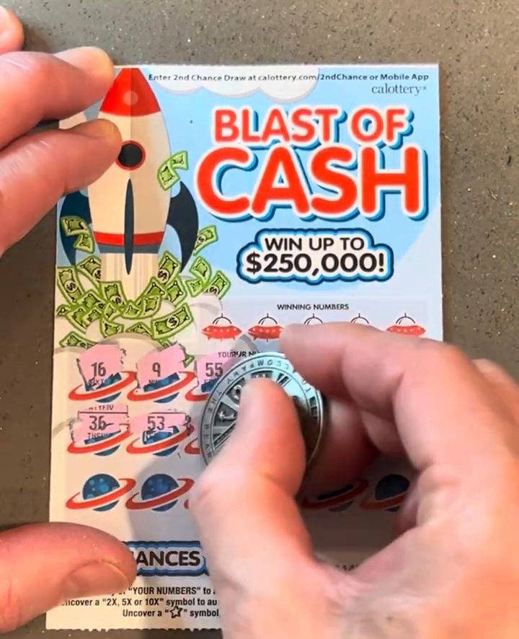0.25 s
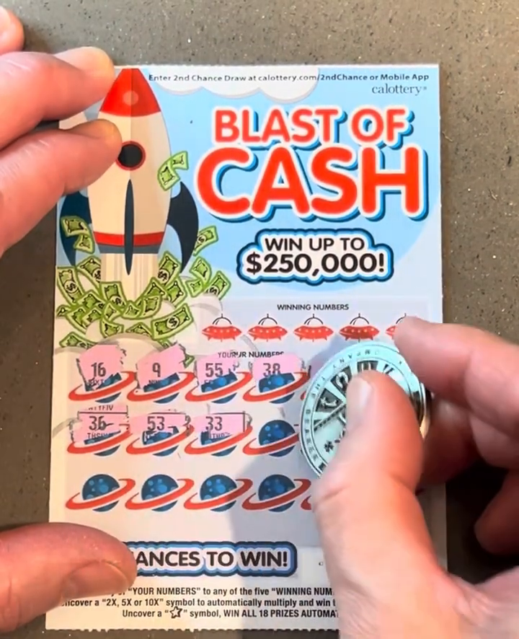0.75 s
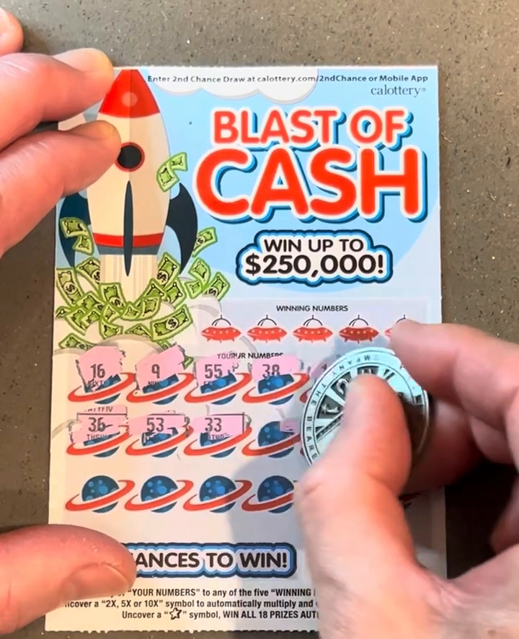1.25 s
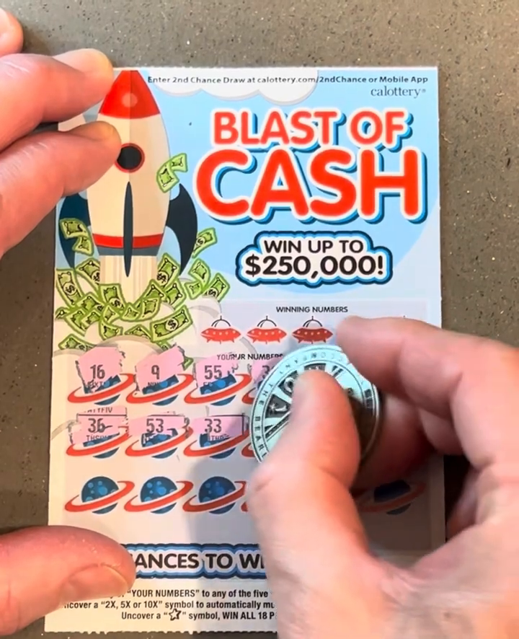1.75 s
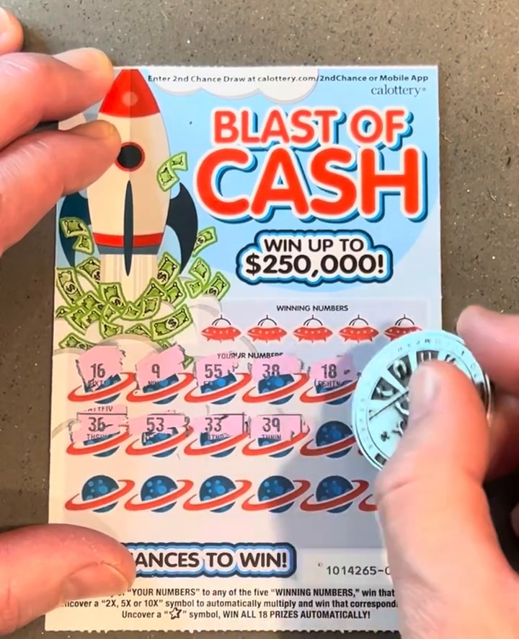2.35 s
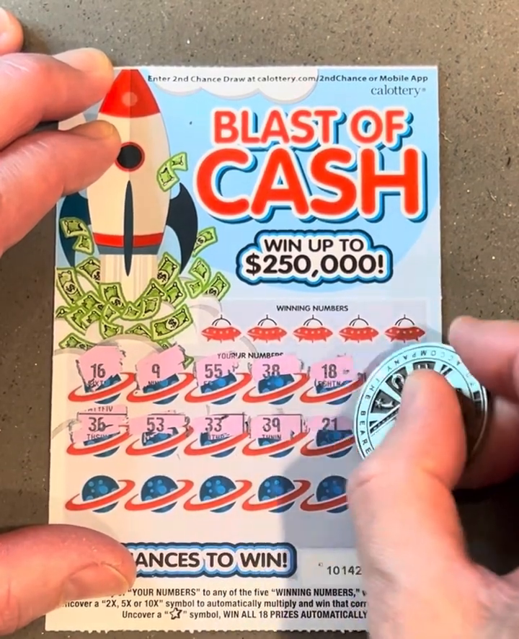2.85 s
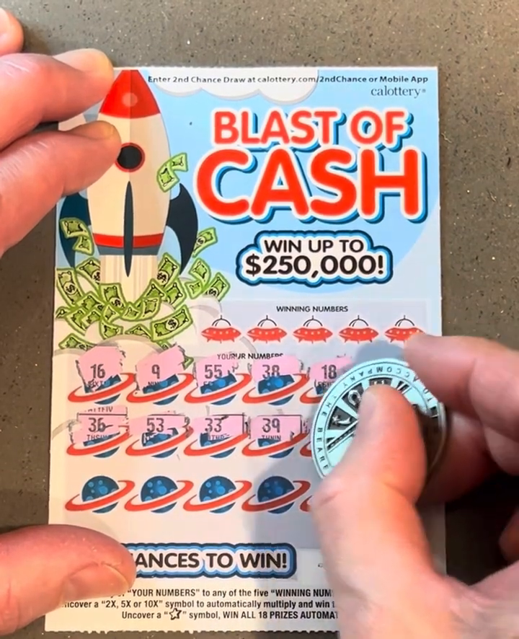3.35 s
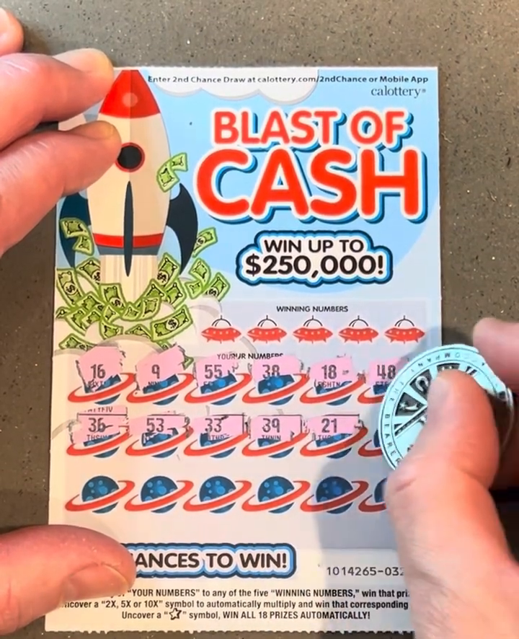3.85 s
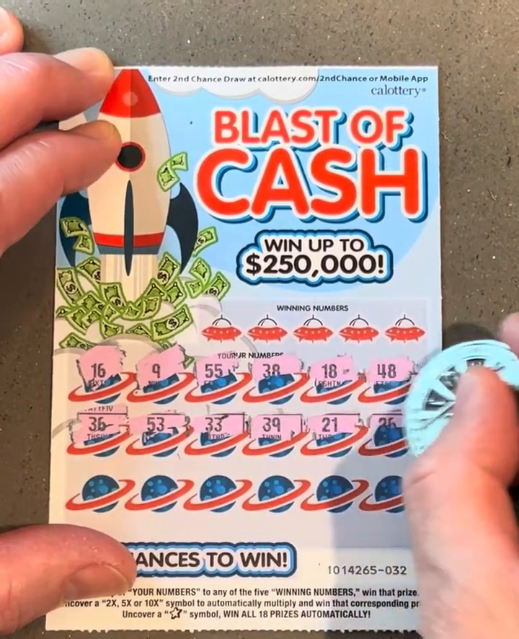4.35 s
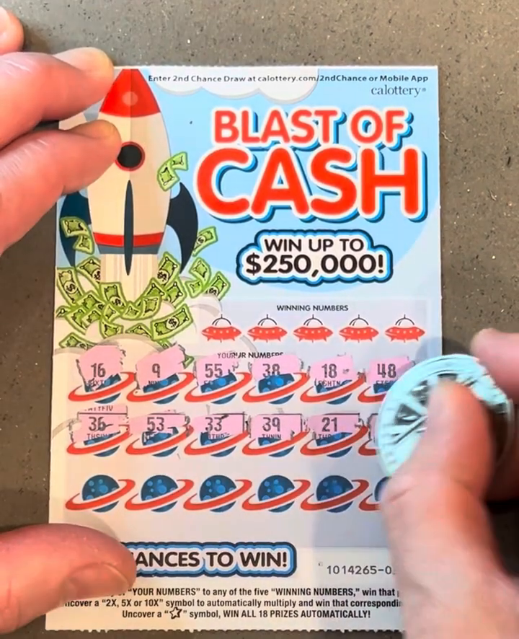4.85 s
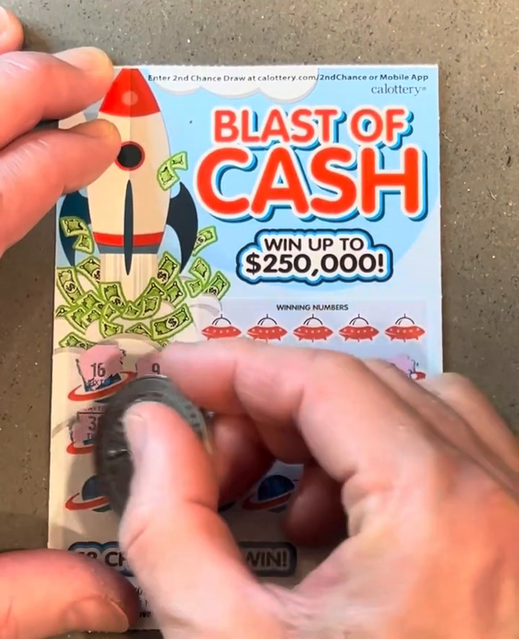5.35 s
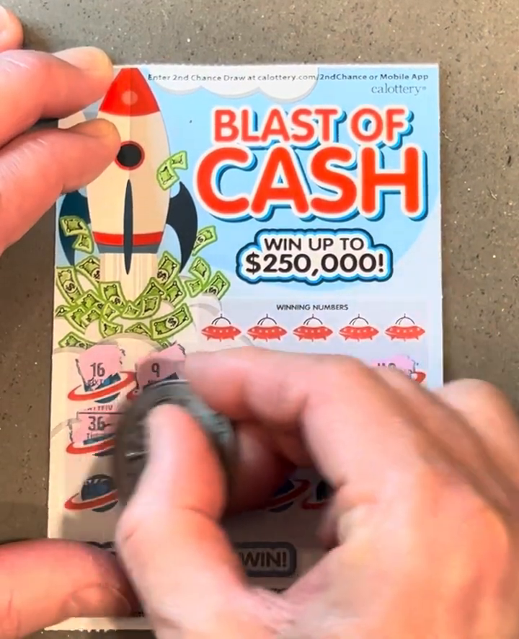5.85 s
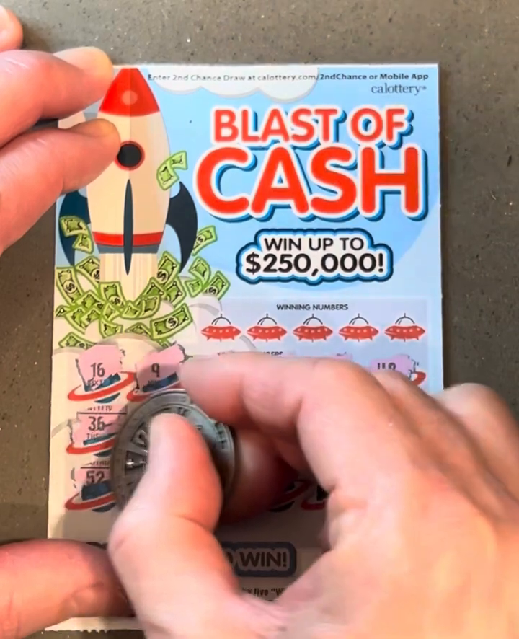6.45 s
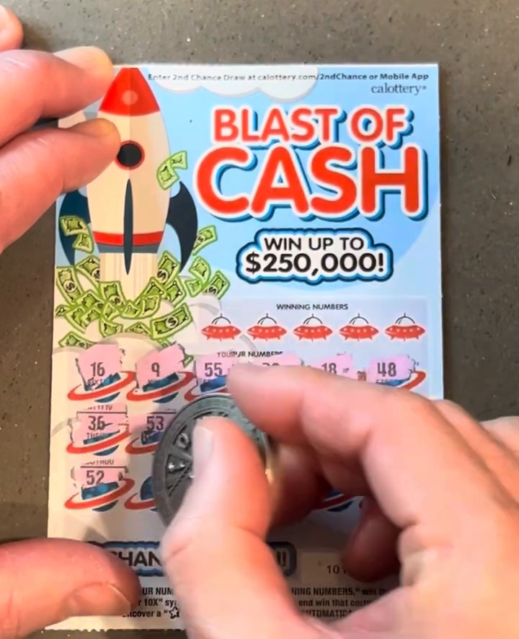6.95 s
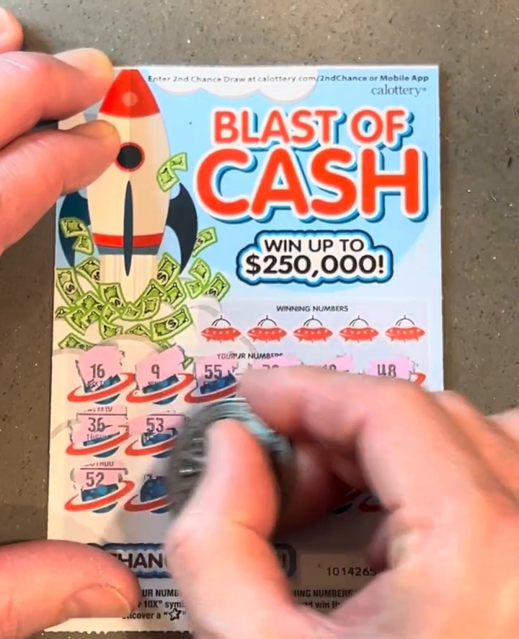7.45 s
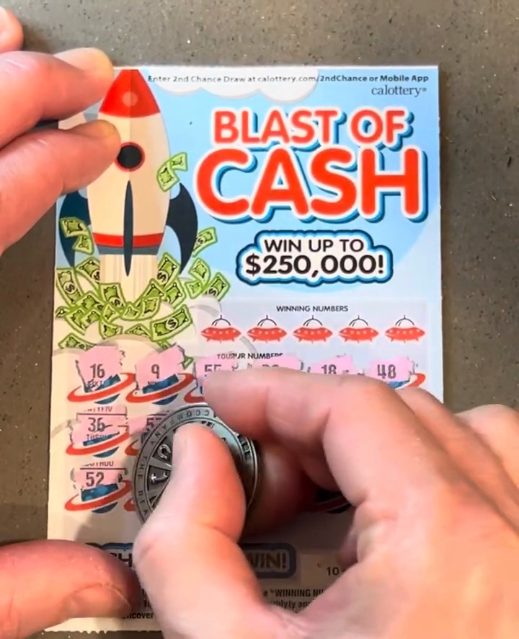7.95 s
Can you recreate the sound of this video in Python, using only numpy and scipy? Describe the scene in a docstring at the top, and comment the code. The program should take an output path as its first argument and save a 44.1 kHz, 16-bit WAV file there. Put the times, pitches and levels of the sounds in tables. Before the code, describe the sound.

Close stereo microphones in a small, quiet room. A coin scrapes coating from a card on a hard table in fast, gritty back-and-forth strokes, about ten a second. Runs of scraping stop for short pauses, each restarted with a light tap and tick. Past the middle one sharp, ringing knock hits the bare table; then scraping resumes, with soft hand thumps, scuffs and card crackles before a last steady run.

```python
"""Coin scratching a paper ticket

A coin scrapes the coating off a ticket on a hard table: stick-slip friction excites card, crumbs and coin.
It taps down with edge ticks, and one sharp knock on the bare table rings a bank of decaying modes.
The side of the hand hisses, rumbles and bumps; the card scuffs and crackles as impulses and filtered noise.
Echoes, diffuse tails and quiet room air reach two close microphone ports, which differ in phase and level."""
import sys
import numpy as np
from scipy import signal
from scipy.fft import rfft, irfft
from scipy.io import wavfile
from scipy.ndimage import uniform_filter1d

SR = 44100
rng = np.random.default_rng(int(sys.argv[2]) if len(sys.argv) > 2 else 0)


def generate_wav(signal):
    """Clip the signal to [-1, 1] and save it as 16-bit WAV at the path in sys.argv[1]."""
    frames = np.transpose(np.atleast_2d(signal))
    scaled = np.clip(frames, -1, 1) * 32767
    pcm = np.round(scaled).astype(np.int16)
    wavfile.write(sys.argv[1], SR, pcm)


N = 361179   # length [samples]

# Levels in the tables are relative: mixing gains and acoustics act on them later.
# room air and microphone hiss: (frequency [Hz], spectral density [dB])
AIR_SPECTRUM = [(20, -17), (65, 6), (300, -5.5), (1000, -37.5), (1800, -18), (4000, -46.5), (10000, -34.5),
                (11800, -20.5), (16000, -42.5)]

# the hand sliding over card and table: (time [s], hiss level [dB])
SLIDE_LEVEL = [(0, -76.5), (0.55, -84.5), (0.74, -72.5), (0.88, -77), (1.02, -68), (1.15, -75.5),
               (1.45, -75.5), (1.8, -85), (3.98, -88.5), (4.12, -68.5), (4.27, -77.5), (4.75, -75),
               (4.87, -81.5), (4.97, -73.5), (5.9, -74), (6.0, -65.5), (6.2, -78.5), (6.68, -64),
               (6.82, -73.5), (7.32, -64), (7.47, -85.5), (8.19, -82.5)]
# colour of the sliding skin: (frequency [Hz], spectral density [dB])
SKIN_SPECTRUM = [(200, 9), (600, 0), (1150, 8), (1600, 8.5), (2200, 6.5), (3200, 5), (4000, 1), (7500, 3),
                 (9500, 0), (12000, 3.5), (16000, -12.5)]
# the hand's weight rumbling through the table: (time [s], level [dB])
RUMBLE_LEVEL = [(0.0, -61), (0.82, -66), (1.25, -58), (1.91, -60.5), (2.37, -64.5), (2.69, -62),
                (3.56, -62), (5.81, -60.5), (6.52, -60), (6.89, -56), (7.12, -60), (8.19, -59)]
# colour of that rumble: (frequency [Hz], spectral density [dB])
RUMBLE_SPECTRUM = [(20, -27), (45, 2), (68, 4), (95, 2), (150, 2), (230, -1.5), (330, -7.5), (480, -12.5),
                   (650, -21.5), (1200, -49)]
RUMBLE_WAVER_DB = 2.5   # the hand's weight shifts unevenly

# the coin's back-and-forth strokes:
# (middle time [s], length [s], rasp of card [dB], crunch of coating [dB], ring of coin [dB])
STROKES = [(0.048, 0.055, -62.5, -87, -83), (0.142, 0.082, -50.0, -66, -65.5),
           (0.252, 0.064, -66.0, -73, -86), (0.33, 0.078, -59.0, -89, -82), (0.424, 0.073, -58.5, -70, -69),
           (0.901, 0.073, -61.5, -69, -86), (1.002, 0.084, -56.0, -63.5, -82),
           (1.106, 0.07, -59.0, -65, -74), (1.224, 0.061, -53.5, -70, -82),
           (1.322, 0.061, -58.0, -62, -69.0), (1.418, 0.06, -61.0, -72, -80),
           (1.512, 0.072, -59.5, -66, -70), (1.6, 0.062, -58.0, -67, -74.5),
           (1.712, 0.076, -61.0, -72, -79), (1.831, 0.06, -55.5, -76, -77), (1.914, 0.057, -60.5, -68, -75),
           (2.013, 0.084, -49.5, -64.5, -66), (2.122, 0.057, -61.0, -73.5, -70.5),
           (2.21, 0.096, -66.0, -84, -78), (2.623, 0.087, -48, -63, -63), (2.733, 0.066, -63.0, -65, -68),
           (2.822, 0.077, -51.0, -70, -66.5), (2.93, 0.051, -63.0, -65, -65),
           (3.02, 0.052, -62.0, -88, -77.5), (3.102, 0.065, -63.5, -72, -74),
           (3.2, 0.083, -51.5, -70.5, -66.5), (3.333, 0.057, -63.0, -70, -69.5),
           (3.395, 0.05, -58, -90, -79), (3.825, 0.065, -63.0, -86, -76), (3.921, 0.081, -59.0, -76.5, -77),
           (4.04, 0.072, -64.5, -70, -71), (4.138, 0.045, -53, -65, -70.0),
           (4.222, 0.079, -64.5, -70.5, -74.5), (4.338, 0.051, -53, -63, -70),
           (4.415, 0.062, -67.5, -76, -71), (4.501, 0.084, -49.5, -64.5, -69.5),
           (4.604, 0.077, -58.5, -66.5, -69.5), (4.702, 0.071, -53, -77, -67.5),
           (4.811, 0.069, -66.5, -77, -74), (4.897, 0.063, -66.0, -82, -74),
           (5.563, 0.061, -58.5, -65, -69), (5.645, 0.079, -59.5, -65, -76),
           (5.749, 0.082, -62.5, -82, -92), (5.857, 0.081, -61.0, -70, -83),
           (5.956, 0.065, -57.5, -62.5, -67), (6.054, 0.07, -55.5, -74, -65),
           (6.151, 0.073, -57.0, -65, -71.5), (6.255, 0.075, -52.5, -61.5, -69),
           (6.348, 0.063, -57.5, -63.5, -65.5), (6.44, 0.075, -49.5, -62.5, -65),
           (6.545, 0.062, -62.5, -84, -85), (6.623, 0.054, -51.0, -66, -67), (7.128, 0.055, -62, -61, -81),
           (7.239, 0.072, -62.5, -89, -80), (7.328, 0.066, -61.0, -63, -74),
           (7.425, 0.065, -58.0, -69, -76), (7.543, 0.064, -58.0, -61, -64),
           (7.657, 0.082, -59.5, -76, -75.5), (7.748, 0.069, -62.5, -70.5, -73),
           (7.852, 0.07, -61.0, -72, -78), (7.95, 0.086, -63.0, -69, -79),
           (8.037, 0.082, -65.5, -70.5, -93), (8.138, 0.072, -60.5, -66.5, -68)]
# resonances of card and fingers under the edge: (frequency [Hz], width [Hz], level [dB])
RASP_MODES = [(843, 80, 0), (1032, 150, 3), (1243, 138, 4.5), (1382, 123, 5), (1537, 134, 6), (1760, 58, 1),
              (2450, 2400, -11)]
# the coin, damped by the fingers: (frequency [Hz], width [Hz], level [dB])
COIN_MODES = [(7613, 320, 1.5), (11520, 480, 7.5), (15730, 300, -0.5)]
# coating breaking into crumbs: (frequency [Hz], spectral density [dB])
CRUMB_SPECTRUM = [(250, 7), (700, 10), (2000, 7), (2800, 4.5), (3800, 1), (5400, -3), (6300, 0.5),
                  (9000, -3), (16000, -1.5)]
GRIP_S, LIFT_S = 0.027, 0.026   # the edge takes hold of the coating, and lets go of it
STROKE_LEAD, STROKE_SKEW = 0.25, 0.25   # how far top speed comes early, and how much that varies
SAG_DB_PER_S = 43   # the pressure eases along each stroke
# an upper resonance of the card, against the rasp
OVERTONE_HZ, OVERTONE_WIDTH_HZ, OVERTONE_DB = 3140, 290, -25.5
GRIP_SCATTER_OCTAVES = 0.04   # the coin is held a little differently each time
TOP_RASP_HZ = 1580   # ceiling of a stroke's slip rate, before its fine waver

# ticket and fingers brushing the table: (middle time [s], length [s], level [dB], centre frequency [Hz])
SCUFFS = [(0.728, 0.27, -77.5, 3230), (1.124, 1, -60.5, 415), (1.381, 0.048, -51.5, 475),
          (2.506, 0.17, -65.5, 720), (3.729, 0.16, -60, 597), (5.626, 0.075, -54, 726),
          (5.773, 0.13, -53, 442), (6.934, 0.25, -64.5, 580), (6.967, 0.22, -51.5, 167),
          (6.997, 0.016, -41, 486), (7.769, 0.052, -55.5, 312), (8.001, 0.17, -58.5, 505)]

# the coin landing on the ticket: (time [s], peak level [dB], contact time [ms], edge tick [dB])
TAPS = [(0.817, -33.5, 0.99, -37.5), (2.4372, -31, 0.89, -36.5), (3.483, -43.5, 0.51, -55.5),
        (3.694, -24.5, 0.93, -41.5), (4.898, -47.5, 0.45, -57), (5.431, -39, 1.2, -51),
        (5.721, -44.5, 1, -72), (6.8395, -33, 0.38, -52), (7.0501, -33.5, 0.92, -36.5)]
# the edge snagging on the card: (time [s], level [dB])
SNAGS = [(1.3119, -52), (1.722, -52.5), (2.8335, -54), (2.225, -52.5), (4.963, -50), (5.9886, -31)]
# colour of the edge ticks: (frequency [Hz], spectral density [dB])
TICK_SPECTRUM = [(1000, -8), (2500, 0), (5000, -3.5), (8000, 2), (11000, 5.5), (16000, 0)]
EDGE_LEAD_S = 0.0026   # the edge ticks on the card this long before the card meets the table
# the side of the hand bumping the table: (time [s], peak level [dB], contact time [ms])
BUMPS = [(1.158, -46, 5.8), (1.375, -49, 1.2), (2.919, -43, 4.4), (4.35, -48, 11), (5.764, -34, 1.63),
         (6.642, -40, 5.5), (6.921, -34.5, 3.85), (6.995, -31, 4.5), (7.294, -41, 5.1), (7.828, -41, 3)]
# the table top under the ticket: (frequency [Hz], level [dB], 60 dB decay time [s])
TABLE_MODES = [(138, -16.5, 0.09), (216.7, -15, 0.13), (303, -11.5, 0.036), (449.2, -6, 0.15),
               (475, -1.5, 0.078), (720, -10.5, 0.046), (830, -17, 0.06), (1222, -4.5, 0.055),
               (1360, 2.5, 0.016), (1567, -1, 0.038), (1766, -0.5, 0.04)]
# the card slapped against the table: (frequency [Hz], spectral density [dB])
SLAP_SPECTRUM = [(30, -38), (150, -9), (450, -8), (650, -7.5), (1400, -5), (2200, -6.5), (4000, -13.5),
                 (9000, -52), (16000, -38)]

# the card crackling as it flexes under the hand: (time [s], level [dB])
CRACKLES = [(1.367, -53.5), (5.655, -50), (6.832, -45), (6.917, -59.5), (6.988, -54.5), (7.839, -52)]
# colour of the crackles: (frequency [Hz], spectral density [dB])
CRACKLE_SPECTRUM = [(300, 4), (1200, -0.5), (1900, 1.5), (2600, -8), (4000, -22), (12000, -36)]

# the sharp knock, a quick cluster of cracks and its early echo: (time [s], level [dB])
KNOCK_CRACKS = [(5.2078, -1), (5.2091, -4.5), (5.2106, -1.5), (5.2176, -0.5)]
# what the knock rings; close modes beat: (frequency [Hz], level [dB], 60 dB decay time [s])
KNOCK_MODES = [(173, -14, 0.12), (248.2, -12, .1), (459.5, -14, .12), (490, 3, 0.11), (538.5, -5.5, 0.089),
               (638, -6.5, 0.084), (781.5, -3.5, 0.054), (911, -13.5, 0.1), (1085, -12, 0.065),
               (1300, -14, 0.076), (2105, -5, 0.1), (2178, 4.5, .065), (2166, -13, 0.34), (2208, -7, 0.23),
               (2600, -13, 0.15), (2729, -7, .14), (2838, -3.5, 0.17), (3060, -17, 0.12), (3510, -18, 0.14),
               (4170, -24, 0.2), (4300, -19, 0.18), (5370, -22, 0.19), (5525, -21, 0.17),
               (7600, -17.5, 0.13)]
# colour of the knock's cracks: (frequency [Hz], spectral density [dB])
CRACK_SPECTRUM = [(25, -24), (200, 9), (500, 7), (900, 5.5), (1700, -16.5), (2050, 0), (4000, -3),
                  (6000, -6.5), (9000, -13), (12000, -12), (16000, -17.5)]

# round trips to hard surfaces near the table: (delay [s])
ECHO_DELAYS = [0.00255, 0.0085, 0.01105, 0.0147]
# decay of the room: (frequency [Hz], 60 dB decay time [s])
ROOM_DECAY = [(100, 0.54), (500, 0.41), (2200, 0.3), (6000, 0.25), (15000, 0.063)]
# how much the two ports differ: (frequency [Hz], side against mid [dB])
PORT_WIDTH = [(60, -46.5), (130, -31.5), (300, -17.5), (700, -9.5), (1300, -17), (2300, -48), (8000, -18.5),
              (16000, -28)]
# how far the left port lags the right; a full turn at its resonance: (frequency [Hz], phase [rad])
PORT_PHASE = [(4000, 0), (4600, .6), (4900, 1.9), (5200, 4.8), (5600, 6.2), (7400, 6.35), (12600, 9.23),
              (16000, 9.2)]
# how much louder the left port is, negative for quieter: (frequency [Hz], level [dB])
PORT_LEAN = [(160, 0), (330, -2.3), (1300, -1.6), (1900, 0)]
CUTOFF_HZ = 16100


def from_db(db):
    """Logarithmic level: decibels to amplitude gain."""
    return 10 ** (np.asarray(db) / 20)


def rms_one(x):
    """Power normalisation: scale to an rms of 1."""
    return x / np.sqrt(np.mean(x ** 2) + 1e-20)


def at_hz(points, hz):
    """Logarithmic frequency scale: interpolate a curve along it."""
    f, value = np.transpose(points)
    return np.interp(np.log(hz + 0.0015), np.log(f), value)


def in_time(rows):
    """Linear interpolation: read a curve at every sample."""
    return np.interp(np.arange(N) / SR, *np.transpose(rows))


def colour(x, spectrum):
    """Linear filtering: multiply the Fourier spectrum by a gain curve."""
    gain = from_db(at_hz(spectrum, np.fft.rfftfreq(len(x), 1 / SR)))
    return irfft(rfft(x) * gain, len(x))


def noise(spectrum):
    """Stationary random noise with a given spectrum, rms 1."""
    return rms_one(colour(rng.standard_normal(N), spectrum))


def grains(per_s, spread_db):
    """Random impulse process: tiny slips at random moments, a few much larger than the rest."""
    sizes_db = spread_db * np.minimum(rng.exponential(1, N), 5)
    sizes = from_db(sizes_db) * rng.choice([-1, 1], N)
    return sizes * (rng.random(N) < per_s / SR)


def wander(size):
    """Moving average: slow chance of rms 1, smoothed over so many samples."""
    return rms_one(uniform_filter1d(rng.standard_normal(N), size=size))


def resonate(x, hz, width_hz):
    """Resonance: pass one band with steep skirts, rms 1."""
    edges = np.clip([hz - width_hz / 2, hz + width_hz / 2], 10, SR * .45)
    band = signal.butter(2, edges, "band", fs=SR, output="sos")
    return rms_one(signal.sosfilt(band, x))


def dying(t, t60):
    """Exponential damping: the level falls 60 dB in t60 seconds from t = 0."""
    return (t >= 0) * from_db(-60 * np.maximum(t, 0) / t60)


def ringing(modes, scatter_db, sign=1):
    """Modal superposition: struck modes in step or (sign -1) alternating; each blow shares its force anew."""
    t = np.arange(SR // 3) / SR
    total = np.zeros(len(t))
    for k, (hz, db, t60) in enumerate(modes):
        gain = sign ** k * from_db(db + scatter_db * rng.standard_normal())
        total += gain * dying(t, t60) * np.sin(2 * np.pi * hz * t)
    return total


def add(out, s, sound):
    """Superposition: mix a sound in at a time."""
    i = int(s * SR)
    out[i:i + len(sound)] += sound[:N - i]


def bursts(events, t60):
    """Damped envelopes: the gain of a quick burst at each (time [s], level [dB])."""
    out, shape = np.zeros(N), dying(np.arange(SR // 4) / SR, t60)
    for s, db in events:
        add(out, s, from_db(db) * shape)
    return out


def room_air(air_db=-67.5):
    """Stationary background noise: room air and microphone hiss."""
    return from_db(air_db) * noise(AIR_SPECTRUM)


def hand(hiss_db=3.0, rumble_db=0.0):
    """Sliding friction: skin hisses finely over the card while the hand's weight rumbles in the table."""
    hiss = rms_one(colour(grains(per_s=20000, spread_db=4.0), SKIN_SPECTRUM))
    hiss_gain = from_db(in_time(SLIDE_LEVEL) + hiss_db)
    waver = RUMBLE_WAVER_DB * wander(size=3500)
    rumble_gain = from_db(in_time(RUMBLE_LEVEL) + rumble_db + waver)
    return hiss_gain * hiss + rumble_gain * noise(RUMBLE_SPECTRUM)


def chatter(rasp, slip_hz, pressure, onset_db=-57.0, most_share=0.75, waver_octaves=0.11):
    """Stick-slip oscillation: under pressure, part of the rasp becomes an almost regular, rough chirp."""
    share = np.clip(most_share, 0, 1) * pressure ** 2 / (pressure ** 2 + from_db(onset_db) ** 2)
    wavering_hz = slip_hz * 2 ** (waver_octaves * wander(size=90))
    chirp = np.sin(2 * np.pi * np.cumsum(wavering_hz) / SR)
    return np.sqrt(1 - share) * rasp + np.sqrt(share) * rms_one(chirp)


def scraping(centre_hz=1290, rise_per_db=0.05, reach_octaves=0.36, glide_octaves=0.42,
             grit_db=2.5, rasp_db=-1.04, crunch_db=0.0, ring_db=3.5):
    """Frictional excitation: each stroke's slips shake the card, crumble the coating and ring the coin."""
    t = np.arange(N) / SR
    levels, centre = np.zeros((3, N)), np.full(N, float(centre_hz))
    usual_rasp = np.mean([row[2] for row in STROKES])
    for s, length, rasp, crunch, ring in STROKES:
        start = s - length / 2
        span = slice(max(int(start * SR), 0), int((start + length) * SR))
        age = t[span] - start
        skew = np.exp(STROKE_SKEW * rng.uniform(-0.963, 1) - STROKE_LEAD)
        speed = np.sin(np.pi * np.clip(age / length, 0, 1) ** skew)
        grip = GRIP_SCATTER_OCTAVES * rng.standard_normal()
        hold = np.minimum(age / GRIP_S, (length - age) / LIFT_S)
        contact = np.sin(np.pi / 2 * np.clip(hold, 0, 1))
        sag = from_db(SAG_DB_PER_S * (length / 2 - age))
        levels[:, span] += from_db([[rasp], [crunch], [ring]]) * contact ** 1.67 * sag
        # a harder and faster edge rasps higher
        top_hz = min(centre_hz * 2 ** (grip + rise_per_db * (rasp - usual_rasp)), TOP_RASP_HZ)
        centre[span] = top_hz * 2 ** (glide_octaves * (speed ** 2 - 1))
    slips = grains(per_s=4400, spread_db=1.5)
    octave = np.log2(centre)
    card = np.zeros(N)
    for hz, width, db in RASP_MODES:
        # modes near the slip rate respond most
        share = from_db(db) * np.exp(-.5 * ((np.log2(hz) - octave) / reach_octaves) ** 2)
        card += share * resonate(slips, hz, width)
    # a firm grip keeps the friction even
    card = rms_one(card / np.sqrt(uniform_filter1d(card ** 2, size=900) + 1e-9))
    overtone = from_db(OVERTONE_DB) * resonate(slips, OVERTONE_HZ, OVERTONE_WIDTH_HZ)
    card = chatter(card, centre, levels[0]) + overtone
    crumbs = rms_one(colour(grains(per_s=3200, spread_db=2.0), CRUMB_SPECTRUM))
    coin = rms_one(sum(from_db(db) * resonate(slips, hz, width) for hz, width, db in COIN_MODES))
    grit = rms_one(from_db(grit_db * wander(size=200)))   # the coating is patchy
    rasping = from_db(rasp_db) * levels[0] * card
    crunching = from_db(crunch_db) * levels[1] * crumbs
    coin_ring = from_db(ring_db) * levels[2] * coin
    return grit * (rasping + crunching + coin_ring)


def scuffs(scuff_db=0.0, width_share=0.64, slips_per_cycle=1.6):
    """Irregular friction: rubbing swells and fades; the higher it sounds, the finer its grain."""
    out = np.zeros(N)
    for s, length, db, hz in SCUFFS:
        swell, start = np.hanning(int(length * SR)), s - length / 2
        slips = grains(per_s=slips_per_cycle * hz, spread_db=2.0)
        rub = resonate(slips, hz, width_share * hz)[int(start * SR):][:len(swell)]
        add(out, start, from_db(db + scuff_db) * rms_one(rub) * swell[:len(rub)])
    return out


def ticks(tick_db=-1.0, landing_db=-7.0):
    """Impact noise: the edge ticks as it meets the card, again as it lands, and wherever it snags."""
    touches = [(s - EDGE_LEAD_S, tick) for s, db, contact_ms, tick in TAPS]
    landings = [(s, tick + landing_db) for s, db, contact_ms, tick in TAPS]
    gain = bursts(touches + landings + list(SNAGS), t60=0.012)
    return from_db(tick_db) * gain * noise(TICK_SPECTRUM)


def taps(tap_db=0.0, slap_db=-8.0, slap_t60=0.074):
    """Contact-time low-pass: the coin's short blows reach upper table modes; the soft hand only thumps."""
    out, t = np.zeros(N), np.arange(SR // 3) / SR
    blows = [(s, db, contact_ms) for s, db, contact_ms, tick in TAPS] + list(BUMPS)
    for s, db, contact_ms in blows:
        push = np.hanning(max(int(contact_ms * SR / 1000), 1) + 2)
        table = ringing(TABLE_MODES, scatter_db=4.5)
        slap_noise = rms_one(colour(rng.standard_normal(len(t)), SLAP_SPECTRUM))
        slap = from_db(slap_db) * slap_noise * dying(t, slap_t60)
        blow = np.convolve(table / np.abs(table).max() + slap, push)
        add(out, s, from_db(db + tap_db) * blow / np.abs(blow).max())
    return out


def crackles(crackle_db=0.0):
    """Sudden release of strain: each flex of the card lets go a short, dying run of snaps."""
    snaps = rms_one(colour(grains(per_s=2900, spread_db=7.5), CRACKLE_SPECTRUM))
    return from_db(crackle_db) * bursts(CRACKLES, t60=0.066) * snaps


def knock(ring_db=-25.0, crack_db=-22.5):
    """Impact and modal ringing: every crack is a dying noise burst; the loudest also starts the modes."""
    out = from_db(crack_db) * bursts(KNOCK_CRACKS, t60=0.027) * noise(CRACK_SPECTRUM)
    loudest_s = max(KNOCK_CRACKS, key=lambda crack: crack[1])[0]
    add(out, loudest_s, from_db(ring_db) * ringing(KNOCK_MODES, scatter_db=1.0, sign=-1))
    return out


def echoes(x, echo_db=-16.5, dull_hz=2500):
    """Specular reflection: hard surfaces near the table each send back one dull copy."""
    out, dull = np.zeros(N), colour(x, [(dull_hz, echo_db), (2 * dull_hz, echo_db - 5)])
    for delay_s in ECHO_DELAYS:
        add(out, delay_s, dull)
    return out


def reflections(x, t60_table, delay_s):
    """Diffuse reverberation: a tail of unit energy, each octave dying at its own rate."""
    t = np.arange(SR // 2) / SR
    white, hz = rfft(rng.standard_normal(len(t))), np.fft.rfftfreq(len(t), 1 / SR)
    tail = np.zeros(len(t))
    for centre in 31.25 * 2 ** np.arange(10):
        in_octave = np.abs(np.log2((hz + 1) / centre)) < .5
        tail += irfft(white * in_octave, len(t)) * dying(t - delay_s, at_hz(t60_table, centre))
    return signal.fftconvolve(x, tail / np.sqrt(np.sum(tail ** 2)))[:N]


def two_ports(mid, side):
    """Interchannel phase and level difference: split each evenly between the two ports."""
    hz = np.fft.rfftfreq(N, 1 / SR)
    turn = np.exp(.5j * at_hz(PORT_PHASE, hz)) / from_db(at_hz(PORT_LEAN, hz) / 2)
    left = irfft(rfft(mid + side) / turn, N)
    right = irfft(rfft(mid - side) * turn, N)
    return np.array([left, right])


def scene(near_db=-13.5, near_t60=0.095, room_db=-16.0):
    """Superposition of direct and reflected sound: sources, nearby scatter, room tail and air at two ports."""
    close = hand() + scraping() + scuffs() + ticks() + taps() + crackles() + knock()
    near = echoes(close) + from_db(near_db) * reflections(close, [(1000, near_t60)], delay_s=0.005)
    room = from_db(room_db) * reflections(close, ROOM_DECAY, delay_s=.015)
    mid = close + near + room + room_air()
    # reflections reach the two ports differently
    side = colour(reflections(mid, ROOM_DECAY, delay_s=0.0013), PORT_WIDTH)
    return two_ports(mid, side)


def record(dry):
    """Band limitation: an elliptic low-pass cuts the top steeply."""
    return signal.sosfilt(signal.ellip(10, .2, 70, CUTOFF_HZ, fs=SR, output="sos"), dry)


dry = scene()
out = record(dry)
generate_wav(out)
```